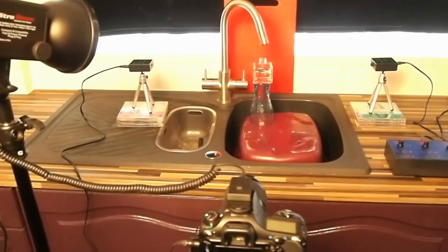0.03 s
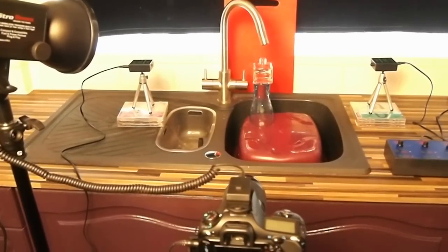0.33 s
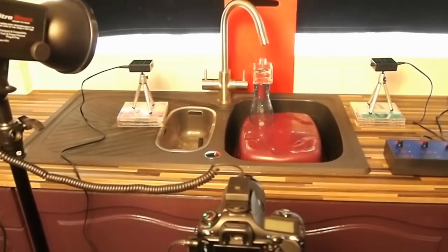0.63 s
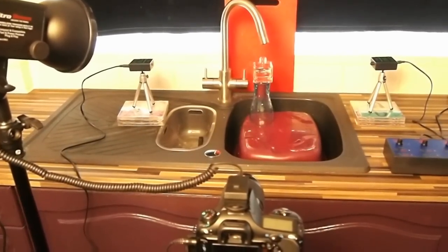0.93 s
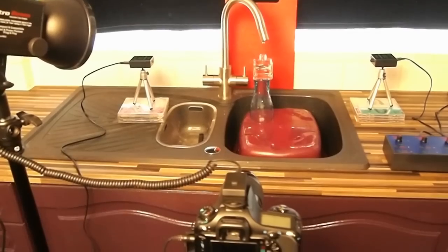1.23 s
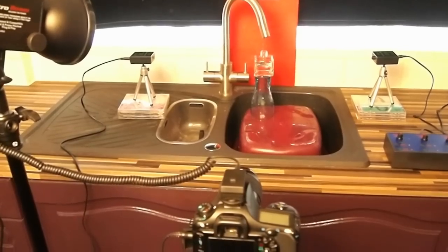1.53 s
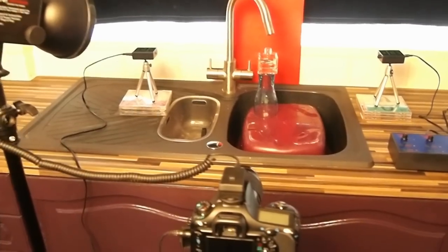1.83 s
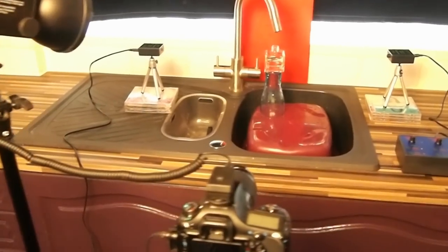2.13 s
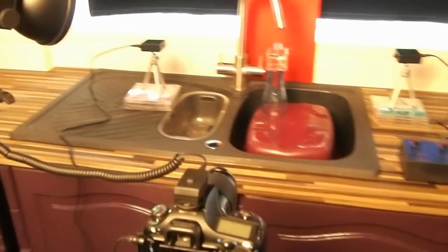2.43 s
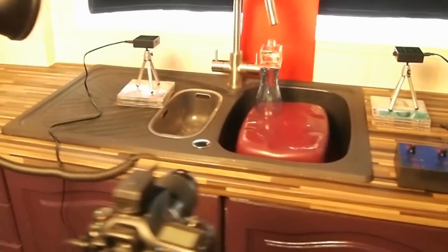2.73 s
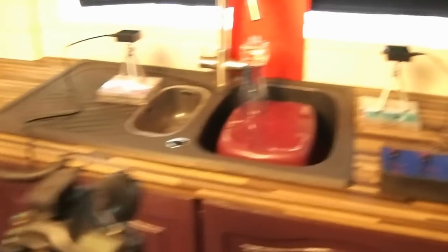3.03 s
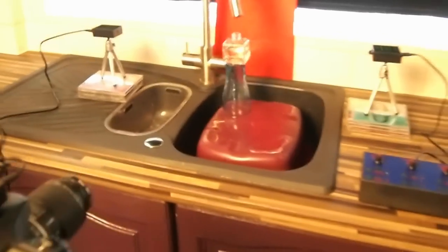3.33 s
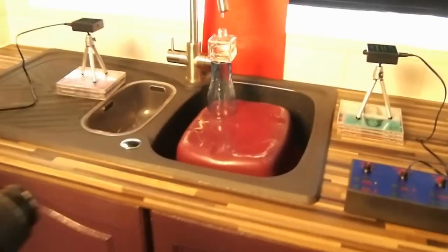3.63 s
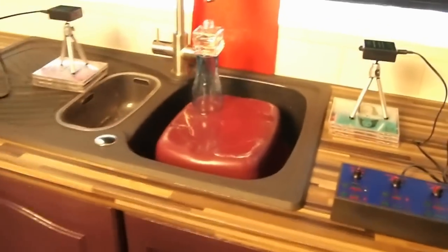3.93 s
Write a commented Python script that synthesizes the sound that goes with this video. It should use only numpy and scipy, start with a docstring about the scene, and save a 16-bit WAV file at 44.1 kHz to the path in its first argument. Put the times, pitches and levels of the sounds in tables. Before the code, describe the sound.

A camera clicks and pulses in a quietly humming kitchen. Faint ticks and squeaks come around 1.6 seconds, then a soft button touch. At 2.4 seconds a trigger snaps and whirrs briefly. A close lens knocks at 2.6 seconds, then pulses rapidly and evenly until the end at 4 seconds. Hand rustling grows from 3 seconds, with a bump at 3.3 and a sharp little rattle around 3.5.

```python
"""An appliance hums over the soft air of a quiet kitchen; a photo rig ticks and squeaks faintly.
A finger settles on a button, the trigger snaps and its mechanism whirrs briefly. Close by a lens drive,
probably focusing, knocks once, then rings its modes in thirty steps a second, weak and strong in turn.
The handheld camera is swung round: it rustles, bumps, and a small hard part rattles against it."""
import sys
import numpy as np
from scipy import signal
from scipy.fft import rfft, irfft
from scipy.io import wavfile
from scipy.ndimage import uniform_filter1d

SR = 44100
rng = np.random.default_rng(int(sys.argv[2]) if len(sys.argv) > 2 else 0)


def unload_audio(sound):
    """Save the sound as a 16-bit wav file, at the path given as the first command line argument."""
    columns = np.transpose(np.atleast_2d(sound))
    # keep every value between -1 and 1, then stretch to whole-number steps
    steps = np.round(np.clip(columns, -1, 1) * 32767)
    wavfile.write(sys.argv[1], SR, steps.astype(np.int16))


N = 176400
TIME_S = np.arange(N) / SR


def undb(db):
    """Decibels to gain."""
    return 10 ** (np.asarray(db) / 20)

def unit(x):
    """Scale to rms 1."""
    return x / np.sqrt(np.mean(x ** 2))

def pan(db):
    """Stereo gains for a left-minus-right level."""
    return undb(np.array([[db], [-db]]) / 2)

def fade(t, t60):
    """Exponential decay from t = 0."""
    return (t >= 0) * np.exp(-np.log(1000) * np.maximum(t, 0) / t60)

def walk(rate_hz):
    """Smooth random motion, rms 1."""
    hold = int(SR / rate_hz)
    stairs = np.repeat(rng.standard_normal(N // hold + 3), hold)
    return unit(uniform_filter1d(stairs, hold)[:N])

def over_hz(points, size=N):
    """Interpolate (f/Hz, value) points at the FFT bins."""
    hz, value = np.array(points, float).T
    return np.interp(np.log(np.fft.rfftfreq(size, 1 / SR) + 1), np.log(hz), value)

def colour(x, spectrum, size=2048):
    """Minimum-phase filter of unit energy."""
    cepstrum = irfft(np.log(undb(over_hz(spectrum, size))))
    cepstrum[1:size // 2] *= 2
    cepstrum[size // 2 + 1:] = 0
    response = irfft(np.exp(rfft(cepstrum)))
    return signal.fftconvolve(x, response[None] / np.linalg.norm(response), axes=1)[:, :N]

def butter(x, order, hz, kind="low"):
    """Low- or high-pass."""
    return signal.sosfilt(signal.butter(order, hz, kind, fs=SR, output="sos"), x)

def resonate(x, hz, width_hz):
    """Two band-pass stages, each width_hz wide; output rms 1."""
    b, a = signal.iirpeak(hz, hz / width_hz, fs=SR)
    return unit(signal.lfilter(b, a, signal.lfilter(b, a, x)))

def burst(t, t60):
    """Decaying stereo noise, unit energy per channel."""
    noise = rng.standard_normal((2, len(t))) * fade(t, t60)
    return noise / np.linalg.norm(noise, axis=1, keepdims=True)

def ring(blows, modes):
    """Blows (t/s, level/dB) ring the damped modes of a body."""
    t, force = TIME_S[:SR // 2], np.zeros(N)
    for s, db in blows:
        force[min(int(s * SR), N - 1)] += undb(db)
    response = sum(undb(db) * np.sin(2 * np.pi * hz * t) * fade(t, t60) for hz, db, t60 in modes)
    return signal.fftconvolve(force, response)[:N]

def clicks(contacts, spectrum, sharp):
    """Each contact: an impulse of relative size sharp and a dense ring of the casing."""
    out, t = np.zeros((2, N)), TIME_S[:SR // 8]
    for s, db, t60, pan_db in contacts:
        hit = burst(t, t60)
        hit[:, 0] += sharp
        hit *= undb(db) * pan(pan_db) / np.hypot(1, sharp)
        start = int(s * SR)
        out[:, start:start + len(t)] += hit[:, :N - start]
    return colour(out, spectrum)

def kitchen(x, wet_db, t60_s=.27, delay_s=.006):
    """Add the short diffuse echo of the room."""
    tail = burst(TIME_S[:SR // 2] - delay_s, t60_s)
    return x + undb(wet_db) * signal.fftconvolve(x, tail, axes=1)[:, :N]


# air spectrum: f/Hz, level/dB
AIR_SPECTRUM = [(25, -32), (48, -26), (64, -25), (80, -23), (98, -15), (125, -17), (220, -12), (310, -15),
                (480, -19.5), (762, -20), (1170, -26), (2500, -30.5), (6000, -37), (15500, -44)]
# left-right coherence: f/Hz, coherence/0-1
AIR_COHERENCE = [(60, 0.54), (300, 0.65), (640, 0.42), (1400, 0.37), (4000, 0.16)]

def room_air(mid_db=-56.5):
    """Soft, low air noise, wider in the treble."""
    coherence, gain = over_hz(AIR_COHERENCE), undb(over_hz(AIR_SPECTRUM))
    side_gain = gain * np.sqrt((1 - coherence) / (1 + coherence))
    mid, side = (irfft(rfft(rng.standard_normal(N)) * g, N) for g in (gain, side_gain))
    return np.array([mid + side, mid - side]) / np.std(mid) * undb(mid_db) * pan(-1.35)

# hum lines: f/Hz, level/dB, pan/dB
HUM_LINES = [(400.9, -57, -2.5), (99.3, -73, -2.5)]

def appliance_hum(drift=.0012, waver_db=.5):
    """Two tones, wavering slightly in pitch and level."""
    out = np.zeros((2, N))
    for hz, db, pan_db in HUM_LINES:
        phase = 2 * np.pi * np.cumsum(hz * (1 + drift * walk(6.05))) / SR
        out += np.sqrt(2) * np.sin(phase) * undb(db + waver_db * walk(9.15)) * pan(pan_db)
    return out

# touches on the rig: t/s, f/Hz, stage width/Hz, level/dB, t60/s
RIG_TICKS = [(1.57, 4570, 400, -57, .06), (1.569, 6200, 3500, -54, .02), (1.57, 7320, 260, -51, .16),
             (3.187, 8000, 6000, -52, .025), (3.918, 8700, 1800, -53.5, .14)]

def rig_ticks():
    """Light touches on metal leave brief bands of high ringing."""
    out = np.zeros((2, N))
    for s, hz, width, db, t60 in RIG_TICKS:
        band = resonate(rng.standard_normal((2, N)), hz, width)
        out += band * undb(db) * fade(TIME_S - s, t60)
    return out * pan(-7)

# slides: peak t/s, half length/s, f/Hz, stage width/Hz, level per layer/dB
SLIDES = [(1.672, .016, 6280, 250, -64), (1.718, .02, 6050, 250, -64), (3.333, .016, 7500, 2000, -47),
          (3.377, .009, 7400, 2200, -45), (3.732, .024, 6600, 2000, -52)]

def scrapes():
    """Brief slides squeak: two layers of narrow noise swell and die away."""
    out = np.zeros((2, N))
    for s, half_s, hz, width, db in SLIDES:
        band = sum(resonate(rng.standard_normal((2, N)), hz, width) for _ in range(2))
        out += band * undb(db) * np.exp(-((TIME_S - s) / half_s) ** 2)
    return out * pan(-7)

# rubbing envelope: t/s, level/dB
RUB_ENVELOPE = [(2.1, -66), (2.18, -57), (2.26, -65), (2.59, -71), (2.615, -54.5), (2.66, -64.5),
                (2.93, -59.5), (2.985, -60), (3.008, -48.5), (3.05, -59), (3.1, -49.5), (3.15, -62.5),
                (3.19, -53), (3.23, -53.5), (3.3, -45.5), (3.35, -50), (3.46, -48.5), (3.59, -57),
                (3.73, -54), (3.88, -57.5), (3.98, -49.5)]
# rubbing spectrum: f/Hz, level/dB
RUB_SPECTRUM = [(200, -13.5), (600, 5.5), (1500, 4), (3000, 1.5), (6500, -1), (9000, -8.5), (12000, -15.5),
                (15500, -29)]

def hand_rustle(grain_db=1.5):
    """Grainy rubbing of the hand on the housing."""
    friction = unit(rng.standard_normal((2, N)) * undb(grain_db * walk(300)))
    envelope = undb(np.interp(TIME_S, *np.array(RUB_ENVELOPE).T))
    return colour(friction * envelope, RUB_SPECTRUM) * pan(-4)

# hand and palm contacts: t/s, level/dB, t60/s, pan/dB
HAND_BUMPS = [(3.286, -18.5, .059, -5), (3.2925, -10.5, .055, -7), (3.4295, -21, .033, -8),
              (3.4525, -17, .047, -10)]
PALM_THUD = [(3.292, -13, .06, -13)]
# their spectra: f/Hz, level/dB
BUMP_SPECTRUM = [(60, -18), (170, -6), (420, 1), (1100, -7), (1490, 1), (2100, -9), (3500, -13), (4800, -6),
                 (7000, -4.5), (8500, -13), (15000, -30)]
THUD_SPECTRUM = [(35, -16), (80, -5), (130, 0), (300, -4), (700, -25), (3000, -55)]

def hand_bumps():
    """The hand bumps the housing; the palm adds a dull thud."""
    return clicks(HAND_BUMPS, BUMP_SPECTRUM, sharp=.11) + clicks(PALM_THUD, THUD_SPECTRUM, sharp=.5)

# mechanism resonances: f/Hz, half stage width/Hz, level/dB
WHIRR_BANDS = [(640, 190, -5.5), (965, 120, -8), (1640, 140, -2.5), (2760, 300, -6), (3850, 450, 0),
               (5800, 710, -2), (6850, 430, 2)]

def whirr(start_s=2.3703, hold_s=.015, t60_s=.12, level_db=-38.5):
    """A rough, rising buzz of teeth rings the trigger mechanism and dies away."""
    tooth_hz, rise_per_s, roughness = 312, 3, .88
    t = TIME_S - start_s
    tooth = np.floor(tooth_hz * (t + .5 * rise_per_s * np.clip(t, 0, .2) ** 2))
    drive = unit(np.diff(tooth, prepend=tooth[0])) + roughness * rng.standard_normal((2, N))
    body = sum(undb(db) * resonate(drive, hz, 2 * half) for hz, half, db in WHIRR_BANDS)
    envelope = (t >= 0) * fade(np.maximum(t - hold_s, 0), t60_s)
    return unit(butter(body, 4, hz=8200)) * envelope * undb(level_db) * pan(-6.5)

# finger and trigger contacts: t/s, level/dB, t60/s, pan/dB
BUTTON_TOUCHES = [(2.0675, -26, .04, -7), (2.079, -24.5, .025, -5)]
TRIGGER_SNAPS = [(2.3592, -12.5, 0.0059, -4), (2.3605, -3.5, 0.011, -8.5)]
# their spectra: f/Hz, level/dB
BUTTON_SPECTRUM = [(300, -12), (830, 10), (1100, -9), (1450, 6), (2100, -6), (2900, -1), (4800, -3),
                   (7000, -8.5), (9000, -21), (15000, -32)]
TRIGGER_SPECTRUM = [(200, -20), (1330, -17), (2400, -6.5), (2850, -8), (3450, -2), (4700, -2), (6200, -6),
                    (7100, 0), (8000, -14), (9400, -20), (15000, -49)]

def trigger():
    """A finger settles on the button, then the trigger snaps."""
    touch = clicks(BUTTON_TOUCHES, BUTTON_SPECTRUM, sharp=.4)
    return touch + clicks(TRIGGER_SNAPS, TRIGGER_SPECTRUM, sharp=.33)

# contacts of the small part: t/s, level/dB, crack t60/s, low-pass f/Hz
PART_CONTACTS = [(3.4005, -14, .014, 11000), (3.4371, 4.5, .01, 15000), (3.4548, -14, .008, 15000),
                 (3.4644, -2, .014, 8500), (3.4746, -7.5, .009, 7500), (3.5176, -10, .007, 12000),
                 (3.521, -11.5, .013, 8500), (3.5333, -12.5, .009, 7000)]
# its crack: f/Hz, level/dB
PART_SPECTRUM = [(300, -27), (1800, -16), (3700, -13), (4700, -5), (5400, 0), (7000, -2), (8400, -8),
                 (10500, -20), (12700, -16), (15500, -28)]
# its modes: f/Hz, level/dB, t60/s, pan/dB, left lag/s
PART_MODES = [(5250, -2, .012, 2, 0), (6250, -5, .01, -5, 0), (6840, 0, .01, -6, .00008),
              (7600, -1, .008, -5, .00007), (12600, -9, .003, -7, 0)]

def rattle(ring_db=-19.5, crack_db=-6, crack_pan_db=-3.5):
    """A small hard part strikes the camera; each contact cracks and rings it."""
    out, body, t = 0, 0, TIME_S[:SR // 8]
    for hz, db, t60, pan_db, lag_s in PART_MODES:
        age = t - np.array([[lag_s], [0]])
        body += undb(db + ring_db) * pan(pan_db) * np.sin(2 * np.pi * hz * age) * fade(age, t60)
    body = butter(body, 2, hz=3900, kind="high")  # too small to radiate lows
    for s, db, t60, top_hz in PART_CONTACTS:
        hit = clicks([(s, crack_db, t60, crack_pan_db)], PART_SPECTRUM, sharp=.23)
        start = int(s * SR)
        hit[:, start:start + len(t)] += body
        out += undb(db) * butter(hit, 2, top_hz)
    return out

# housing all-passes: f/Hz, Q
HOUSING_ALLPASSES = [(935, .6), (520, .7)]

def housing_delay(x):
    """The housing delays lows behind highs: a pulse becomes a short falling chirp."""
    for hz, q in HOUSING_ALLPASSES:
        _, a = signal.iirpeak(hz, q, fs=SR)
        x = signal.lfilter(a[::-1], a, x)
    return x

# stereo balance of the lens: f/Hz, pan/dB
LENS_BALANCE = [(100, 12), (400, -8.5), (700, -8.5), (1300, -3.5), (2400, 0)]

def housing_radiation(x, cut_hz=335):
    """The housing passes no bass; the balance varies with frequency."""
    spectrum = rfft(butter(x, 6, cut_hz, "high"))
    return irfft(spectrum * undb(np.outer([.5, -.5], over_hz(LENS_BALANCE))), N)

# body modes at the stop: f/Hz, level/dB, t60/s
KNOCK_MODES = [(480, -5.5, 0.049), (590, -4.5, 0.023), (784, -8, 0.033), (645, 0, 0.0065),
               (1020, -21, 0.028), (1440, -4.5, 0.015), (1710, -4, 0.0088), (2630, -16, .03)]
# crack at the stop: f/Hz, level/dB
KNOCK_SPECTRUM = [(50, -7), (200, -3), (1600, 3), (2300, -8), (3500, 1), (4500, -9), (5900, -2),
                  (7500, -11), (8600, -6), (13000, -21), (16000, -36)]

def lens_knock(at_s=2.5813, blow_db=-24, crack_db=-4.5, crack_t60_s=.007, crack_pan_db=-3):
    """The lens hits its stop: a crack and a short ring of the body."""
    crack = clicks([(at_s, crack_db, crack_t60_s, crack_pan_db)], KNOCK_SPECTRUM, sharp=.75)
    return crack + housing_radiation(ring([(at_s, blow_db)], KNOCK_MODES))

# drive modes: f/Hz, level/dB, t60/s
DRIVE_MODES = [(401.5, -9.5, 0.16), (584, -10.5, 0.082), (694, -11.5, 0.046), (795, -18, 0.047),
               (502, -1.5, 0.0082), (1000, -5, 0.024), (1340, -5.5, 0.017), (1520, -11, .012)]
# slow change of step strength: t/s, level/dB
STEP_ENVELOPE = [(2.7, -1), (3.2, -0.5), (3.58, -2.5), (3.98, 0)]
# jolts to the lens: t/s, level/dB
LENS_JOLTS = [(3.4565, -31), (3.4644, -34)]

def lens_steps(first_s=2.6249, first_db=-29.5, run_s=2.6845, rate_hz=30):
    """One step, then a run, weak and strong in turn; steps and jolts ring the drive's modes."""
    strong_db, weak_offset_db, scatter_db = -30.5, -7, .8
    times = np.arange(run_s, N / SR, 1 / rate_hz)
    levels_db = strong_db + scatter_db * rng.standard_normal(len(times))
    levels_db[::2] += weak_offset_db
    levels_db += np.interp(times, *np.array(STEP_ENVELOPE).T)
    body = ring([(first_s, first_db), *LENS_JOLTS, *zip(times, levels_db)], DRIVE_MODES)
    return housing_radiation(housing_delay(butter(body, 8, hz=1660)))


def scene():
    """Background and handling dry; the mechanisms with a little room echo."""
    background = room_air() + appliance_hum()
    handling = rig_ticks() + scrapes() + hand_rustle() + hand_bumps()
    return (background + handling
            + kitchen(trigger() + whirr(), wet_db=-24)
            + kitchen(rattle(), wet_db=-36)
            + kitchen(lens_knock() + lens_steps(), wet_db=-20))

def record(dry, notch_hz=7870, notch_q=16.3, top_hz=15900):
    """The recorder has a narrow treble notch and cuts the top."""
    notched = signal.lfilter(*signal.iirnotch(notch_hz, notch_q, fs=SR), dry)
    return signal.sosfilt(signal.ellip(10, .2, 70, top_hz, fs=SR, output="sos"), notched)


dry = scene()
out = record(dry)
unload_audio(out)
```